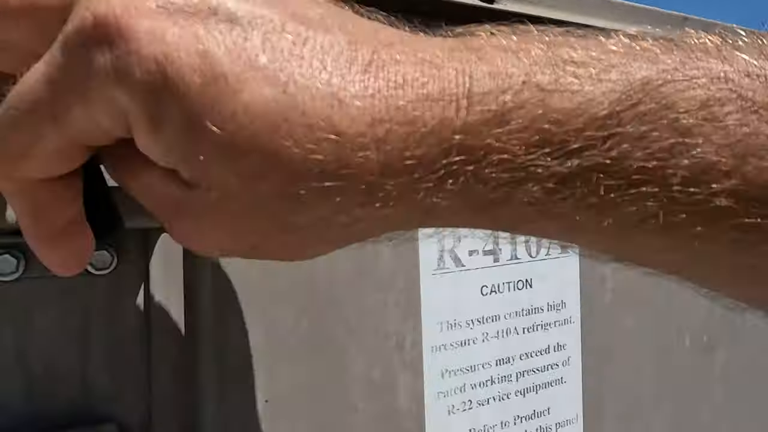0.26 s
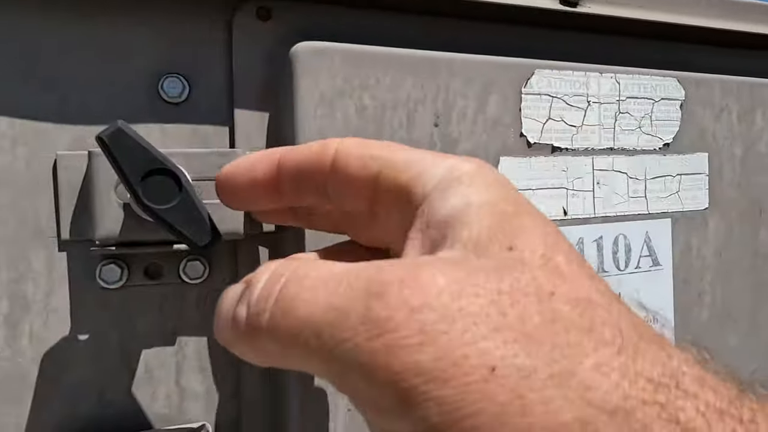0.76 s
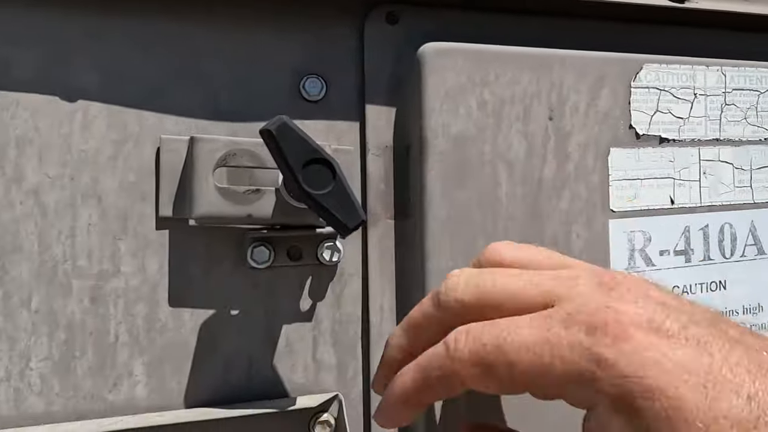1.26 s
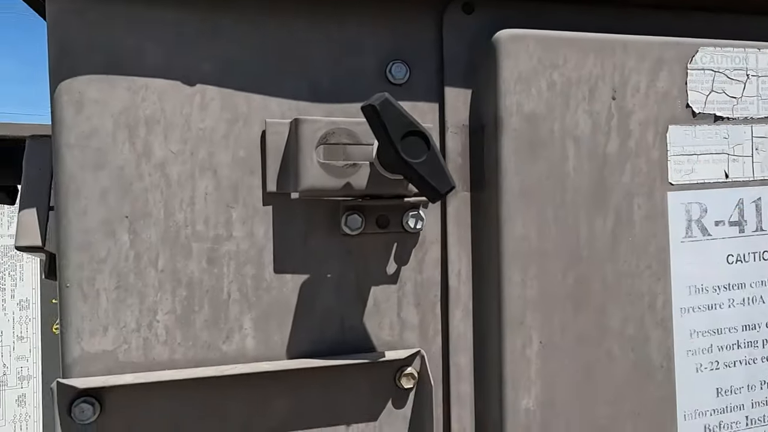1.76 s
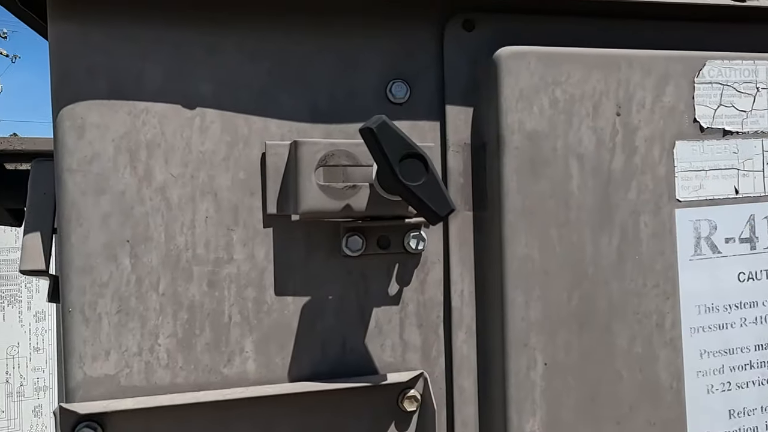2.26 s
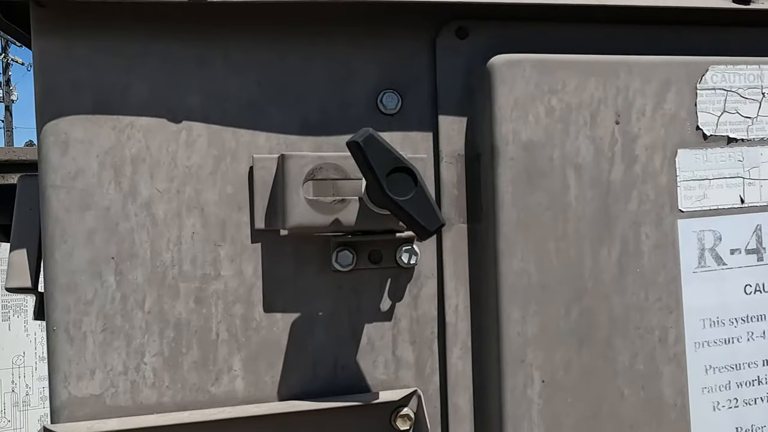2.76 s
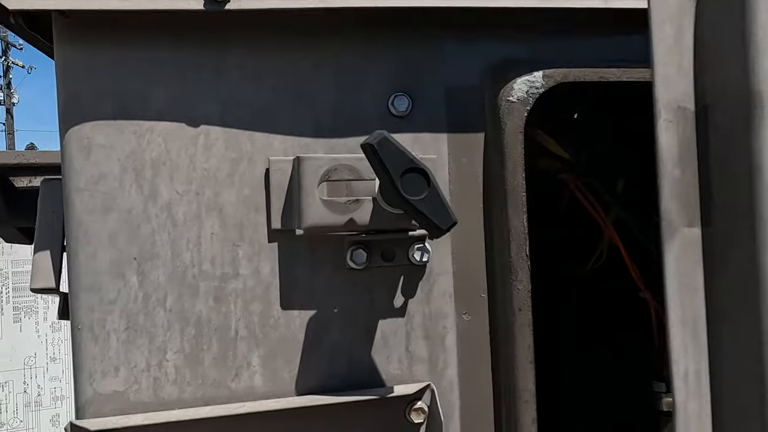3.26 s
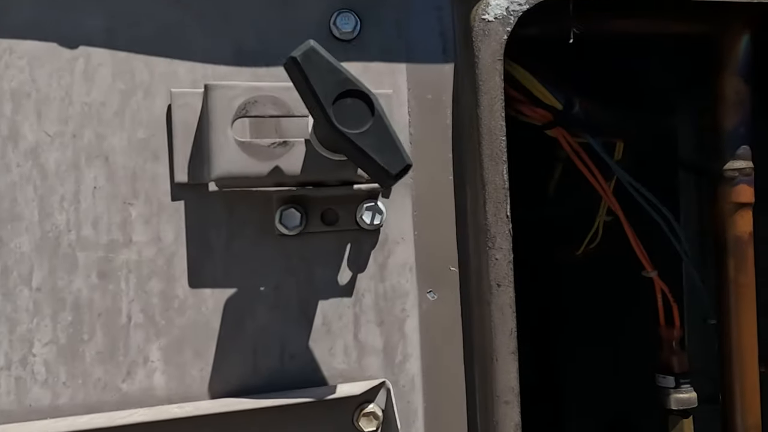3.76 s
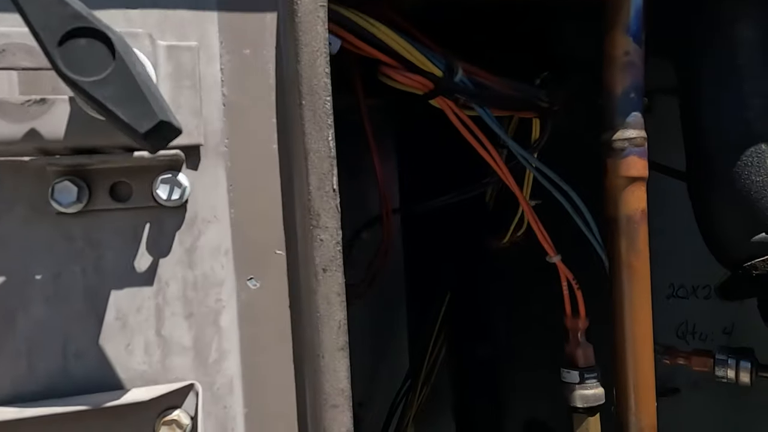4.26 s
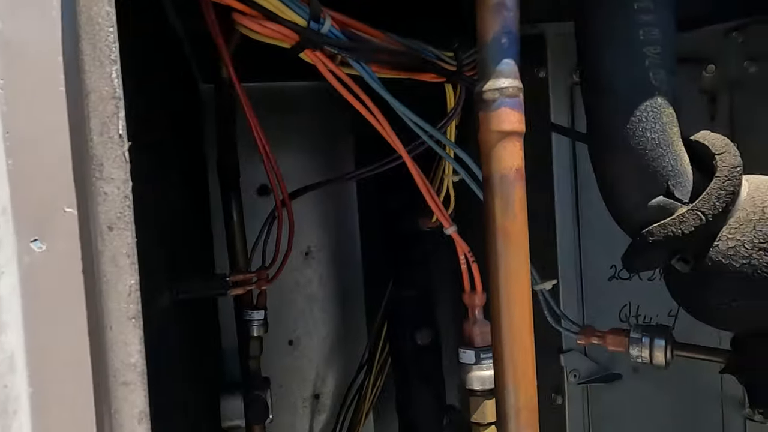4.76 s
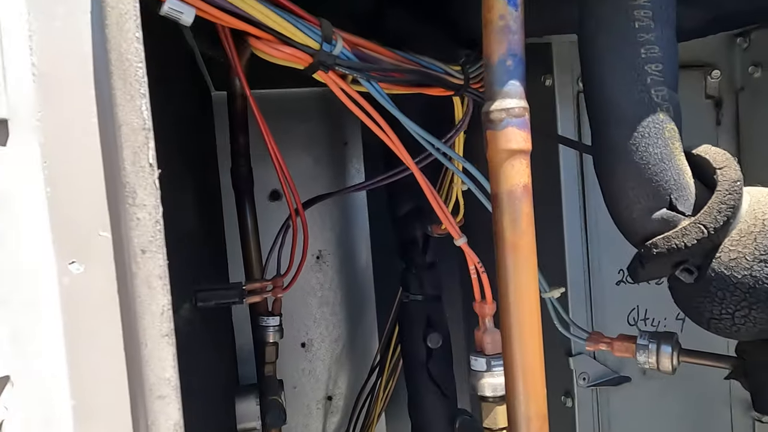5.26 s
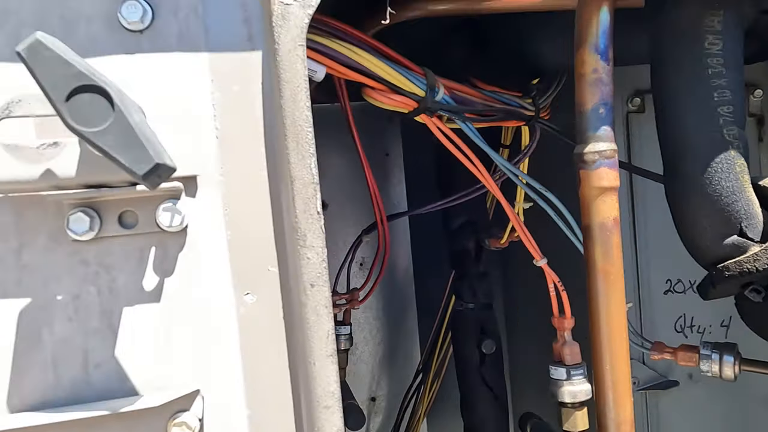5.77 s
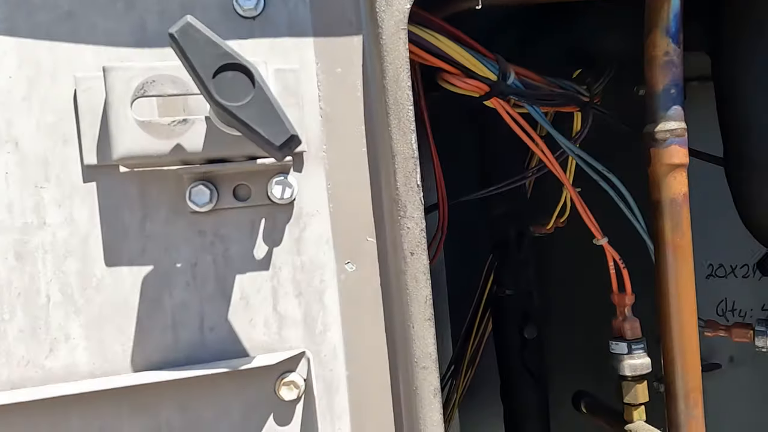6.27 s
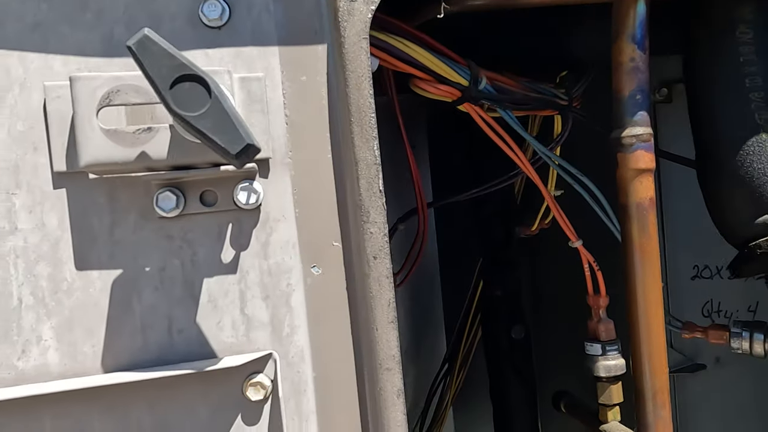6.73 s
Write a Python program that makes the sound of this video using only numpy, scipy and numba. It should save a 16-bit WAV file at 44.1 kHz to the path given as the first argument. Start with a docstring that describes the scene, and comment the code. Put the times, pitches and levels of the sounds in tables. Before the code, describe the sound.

Close to a rooftop air conditioner outdoors, a deep, hollow fan roar runs throughout with a softer rush of air. A latch knocks lightly and scrapes, then snaps with one very loud, dry metallic click. Short breathy puffs of air follow, with small ticking rubs. The service panel brushes off, and a buzzy, hissing compressor with high pipe rings emerges over the roar, strongest about a second later.

```python
"""A fan roars through the sheet-metal cabinet of a rooftop air conditioner, heard from arm's length.
A latch knocks, scrapes and snaps over with one sharp click; then the service panel rubs its way off.
The compressor's buzz, pipe rings and hiss, pulsing once a turn, come out through the opening.
Air and rubbing are filtered noise, the latch decaying modes, the compressor a clatter repeated each turn
with sine harmonics of its shaft."""
import sys
import numpy as np
from scipy import signal
from scipy.fft import rfft, irfft
from scipy.io import wavfile
from scipy.ndimage import uniform_filter1d, minimum_filter1d, map_coordinates
from numba import njit

SR = 44100
rng = np.random.default_rng(int(sys.argv[2]) if len(sys.argv) > 2 else 0)


def wav_record(signal):
    """Record a signal, one row per channel, as 16-bit PCM in the file named by sys.argv[1]."""
    frames = np.transpose(np.atleast_2d(signal))
    bounded = np.clip(frames, -1, 1)
    # unit amplitude maps onto the largest positive 16-bit level
    quanta = np.round(bounded * 32767).astype(np.int16)
    wavfile.write(sys.argv[1], SR, quanta)


N = 308700
TIME = np.arange(N) / SR  # s

# Spectra give relative levels: the noise they colour is scaled afterwards, unless noted.
# low fan roar: (frequency [Hz], density [dB per Hz])
ROAR_SPECTRUM = [(28, -66), (45, -8.5), (75, -37), (96, -1), (160, -0.5), (200, 6.5), (300, 3.5), (370, 1),
                 (480, -4.5), (700, -11), (1200, -108), (4000, -86)]
# overall level of the roar as the listener shifts about: (time [s], level [dB])
ROAR_LEVEL = [(.2, -22), (1.5, -25), (2.2, -22.5), (3.6, -23.5), (7, -24.5)]
# hollow resonances of the cabinet: (frequency [Hz], width [Hz], relative level [dB])
CABINET_MODES = [(97.1, 8.9, 2), (182.7, 9.6, -6.5), (242.7, 8.9, 5.5), (294.8, 7, 11.5)]
RING_DB, RING_OPEN_DB = -2.5, -2.5  # cabinet ring against the roar; change at full opening
# rush of fan air: (frequency [Hz], density [dB per Hz])
RUSH_SPECTRUM = [(30, -2.5), (300, 5.5), (700, 4.5), (1150, 3.5), (1500, 0.5), (2300, -3.5), (2900, -6),
                 (4200, -10), (6800, -27), (8000, -32.5), (9200, -50), (10200, -45), (12100, -39),
                 (13500, -57)]
# rush: level at opening 0, change at full opening, spread of its flutter
RUSH_DB, RUSH_OPEN_DB, RUSH_FLUTTER_DB = -31, -2, 1.34
BOOM_HZ, BOOM_WIDTH_HZ, BOOM_DB = 101.3, 55, -36  # level at full opening
# the loosened door's drone; level at its height, time of the height, 1/e half-length
DRONE_HZ, DRONE_WIDTH_HZ, DRONE_DB, DRONE_S, DRONE_LENGTH_S = 288, 35, -27.5, 2.5, 0.95

# latch blows: (time [s], gain on ring, crack and door [dB], duration of the push [s])
LATCH_BLOWS = [(.3215, -9, .0009), (.3265, -10, .0013), (.92869, 5.2, .00001), (.93027, 1.9, .00038)]
# modes of the latch: (frequency [Hz], level before blow gain and push softening [dB], t60 [s])
LATCH_MODES = [(760, -26, .02), (1860, -11, .009), (2565, -17, .021), (2940, -4, .018), (3035, -10, .0146),
               (3800, -11, .012), (4145, 5, .0039), (4600, 6, .0035), (5120, -12, .007), (5850, -17, .013),
               (7050, -18, .008), (7350, -18, .009), (9960, -15, .0045), (10330, -20, .0065),
               (11960, -24, .011)]
# modes of the door shaken by the latch: (frequency [Hz], level before blow gain [dB], t60 [s])
DOOR_MODES = [(245, -13, .07), (380, -9, .034)]
LATCH_RISE_S, DOOR_RISE_S = .00038, .004
# crack of contact: level before blow gain, decay, pitch that sets how a longer push softens it
CRACK_DB, CRACK_S, CRACK_HZ = -22, .0012, 5000
# crack of contact: (frequency [Hz], density [dB per Hz])
CRACK_SPECTRUM = [(100, -25), (1000, -3), (5000, 0), (8000, -8), (14000, -10)]

# latch and panel rubbing on sheet metal:
# (time [s], level before envelope, edge ring and dulling [dB], attack [s], length [s], centre [Hz])
SCRAPE_EVENTS = [(.25, -23, .003, .011, 2600), (.27, -28, .03, .12, 1100), (.28, -31, .005, .05, 2200),
                 (.3195, -19.5, .0005, .02, 2000), (.335, -27.5, .01, .06, 1900),
                 (.32, -23.5, .003, .04, 600), (.408, -28, .002, .012, 2000), (.766, -34, .005, .048, 2500),
                 (.828, -28, .005, .035, 2600), (.87, -31, .02, .09, 2900),
                 (.9155, -15.5, .001, .012, 1250), (.934, -28.5, .001, .02, 2400),
                 (1.0585, -20, .0003, .007, 1300), (2.725, -32.5, .015, .15, 1500),
                 (2.763, -26, .001, .008, 2800), (2.778, -28.5, .001, .007, 2900),
                 (2.797, -27.5, .001, .007, 2400), (2.821, -26, .001, .008, 2400),
                 (2.843, -29.5, .001, .007, 2600), (3.12, -28.5, .06, .22, 700),
                 (3.13, -33, .03, .16, 1900), (3.56, -27, .08, .18, 850), (3.54, -31, .08, .18, 2300),
                 (3.612, -26, .005, .026, 1400), (3.655, -28, .008, .055, 1500),
                 (3.96, -28.5, .08, .17, 1000), (3.99, -29.5, .05, .13, 2400)]
SCRAPE_GRAIN_DB, SCRAPE_GRAINS_PER_S = 2.6, 420
SCRAPE_WIDTH = .95  # bandwidth as a share of the centre frequency
# rings of the service door's rubbed edge: (frequency [Hz], width [Hz], linear gain [1])
EDGE_MODES = [(2480, 120, 0.14), (3350, 44, 0.2)]
# skin and paint dull the rubbing: (frequency [Hz], filter gain [dB])
SCRAPE_TONE = [(30, -20), (200, 0), (3000, 0), (5000, -3), (8500, -7)]

# panel: halfway time, time scale of the smooth step, compressor sound leaking past it before
PANEL_OFF_S, PANEL_PULL_S, LEAK_DB = 3.445, 0.056, -12.5
SHAFT_HZ, MAINS_HZ = 58.16, 60  # mean shaft speed; mains frequency
# listener closest to the compressor: time, 1/e half-length, gain (the buzz takes half of it)
CLOSEST_S, CLOSEST_LENGTH_S, CLOSEST_DB = 4.57, 0.58, 5
# compressor buzz: (frequency [Hz], density [dB per Hz])
BUZZ_SPECTRUM = [(30, -52), (500, -2), (1000, 7), (1250, 5), (1800, 8.5), (2300, 0.5), (2800, 5),
                 (3700, -2), (4300, -1.5), (4800, 1.5), (5500, 1.5), (5900, 3), (6900, -5.5), (7600, -7),
                 (13000, -33)]
# refrigerant hiss: (frequency [Hz], density [dB per Hz])
HISS_SPECTRUM = [(100, -60), (1500, -4), (3500, 1.5), (5200, 4.5), (5500, 0), (5780, 8), (6100, 3),
                 (6900, 4), (7600, -15.5), (9600, -14), (12100, -4), (13500, -26)]
BUZZ_DB, HISS_DB = -36.5, -40.5  # before the opening
HISS_DECAY_TURNS, HISS_STEADY = .39, .4  # decay after each gas pulse; steady part against its start of 1

# strong harmonics, each snapped to the nearest multiple of the shaft speed:
# (frequency [Hz], level before trim and sway [dB], time halfway clear [s], depth of slip beat [0-1])
SHAFT_HARMONICS = [(407, -32.3, 3.3, .18), (1163, -44.3, 4.55, .1), (1280, -47, 5.1, .1),
                   (1513, -46, 4.25, .45), (1863, -50, 4.15, .1), (1922, -48, 3.45, 0), (2676, -58, 3.6, 0),
                   (3375, -52, 4.35, .3), (3431, -52.5, 4.8, .1), (3779, -56, 3.7, .1), (4592, -57, 3.7, 0),
                   (4710, -55.5, 4.1, .1), (4770, -56, 4.1, .1), (5351, -54, 4, .2), (5873, -53.5, 5.3, .1),
                   (6455, -55.5, 4.5, .1)]
HARMONICS_TRIM_DB, CLEAR_S = -2, 0.086  # trim; time scale of coming clear
# standing waves sway the harmonics: spread, rate, and pitch from which the sway is full
STANDING_DB, STANDING_PER_S, STANDING_FULL_HZ = 1.8, 4.8, 1200
# finer waver: phase spread per Hz of pitch, level spread, rate
WAVER_RAD_PER_HZ, WAVER_DB, WAVERS_PER_S = .00017, 2.5, 14
WHINE_HZ = 4129  # snapped to the nearest shaft harmonic
# compressor whine, fading in and out as the listener moves: (time [s], level before the opening [dB])
WHINE_LEVEL = [(3.6, -62), (3.8, -41.5), (3.98, -44), (4.04, -58), (4.11, -45.5), (4.35, -46), (4.5, -53),
               (4.78, -44.5), (5.2, -57), (6.2, -50.5), (6.7, -62)]

# copper lines whose ring shifts as the listener moves:
# each (time [s], mean frequency [Hz], level before the opening [dB])
THICK_PIPE = [(3.5, 2850, -63), (4.1, 2700, -56), (4.4, 2900, -54), (4.85, 2820, -40.5), (5.2, 2900, -54),
              (5.55, 2750, -47), (6.3, 2870, -48.5), (7, 2850, -57)]
LOW_PIPE = [(3.5, 3700, -54), (3.8, 3770, -51), (4, 3700, -43), (4.2, 3660, -48), (4.52, 3650, -39),
            (4.85, 3570, -47), (5.15, 3580, -44.5), (5.6, 3570, -53), (7, 3500, -49)]
MIDDLE_PIPE = [(3.5, 4600, -60), (3.9, 4660, -46), (4.4, 4800, -62), (5.5, 4740, -71), (7, 4740, -61)]
HIGH_PIPE = [(3.5, 5900, -57), (3.8, 6050, -47), (4.1, 5820, -49), (4.45, 5800, -47), (4.6, 6020, -44),
             (4.75, 5850, -64), (5.25, 6100, -48), (5.5, 5800, -44), (6, 5770, -45), (7, 5800, -46)]
PIPE_LAG_TURNS, PIPE_LENGTH_TURNS = .3, .22  # peak after the gas pulse; 1/e half-length
# spread from turn to turn: level, pitch as a share, phase
PIPE_SCATTER_DB, PIPE_DETUNE, PIPE_SCATTER_RAD = 2, .007, 1.4

# strongest puffs of turbulent air: (time [s], level [dB])
PUFF_EVENTS = [(.65, -34), (1.17, -35.5), (1.308, -37), (1.37, -35), (1.5, -31.5), (1.699, -33),
               (1.837, -34.5), (2.1, -31), (2.232, -33), (2.427, -32), (2.625, -32), (2.828, -37),
               (3.018, -32.5), (3.146, -29), (3.28, -32), (3.445, -32.5)]
# air whistling past the door's edge: (frequency [Hz], density [dB per Hz])
PUFF_SPECTRUM = [(50, -46), (1200, 10.5), (2300, 1), (2900, 10), (3200, 3), (3550, 7.5), (4100, -1.5),
                 (6900, -5), (8500, -25), (12000, -14.5), (13500, -28)]
PUFF_S = .02 / np.sqrt(2)  # 1/e half-length
EDDY_DB, EDDY_SPREAD_DB, EDDIES_PER_S = -45, 4, 40  # level at opening 0

# side against mid, before the side's random swing: (frequency [Hz], filter gain [dB])
SIDE_TONE = [(250, -68), (1000, -48), (4000, -29), (7000, -24), (9000, -20), (10500, -13), (12000, -1)]
# microphone port: (frequency [Hz], filter gain [dB])
PORT_TONE = [(22, -40), (42, 3.5), (8700, 0), (9100, -11), (9500, 0.5)]
TOP_HZ = 13600  # treble cutoff


def fan(opening):
    """Turbulence roars, rings the cabinet and rushes; an open panel eases ring and rush and adds a boom."""
    eddies = noise()
    ring = unit(sum(undb(db) * resonate(eddies, hz, width) for hz, width, db in CABINET_MODES))
    ring = colour(ring, [(30, -38), (70, -5.5), (400, -3.0), (4000, -44)])
    # the closed box rings more than the open one
    ring = undb(RING_DB + RING_OPEN_DB * opening) * ring
    roar = unit(unit(colour(noise(), ROAR_SPECTRUM)) + ring) * level_curve(ROAR_LEVEL)

    rush_db = RUSH_DB + RUSH_OPEN_DB * opening + RUSH_FLUTTER_DB * walk(21.72)
    rush = unit(colour(noise(), RUSH_SPECTRUM)) * undb(rush_db)
    # the open compartment booms like the body of a drum
    boom = opening * undb(BOOM_DB) * narrow_noise(noise(), BOOM_HZ, BOOM_WIDTH_HZ)
    drone = undb(DRONE_DB) * narrow_noise(noise(), DRONE_HZ, DRONE_WIDTH_HZ)
    return roar + rush + boom + drone * swell(DRONE_S, DRONE_LENGTH_S)


def latch():
    """Each blow makes a noisy crack of contact and rings the modes of the latch and the door."""
    out = np.zeros(N)
    age = np.arange(SR // 4) / SR
    cracks = unit(colour(noise(), CRACK_SPECTRUM))
    door = ringing(DOOR_MODES, age, 0) * (1 - np.exp(-age / DOOR_RISE_S))
    for s, blow_db, push in LATCH_BLOWS:
        span = int(s * SR) + np.arange(len(age))
        crack = undb(CRACK_DB) * cracks[span] * np.exp(-age / CRACK_S)
        crack = crack / np.hypot(1, CRACK_HZ * push)  # a soft blow cracks less
        ring = ringing(LATCH_MODES, age, push) * (1 - np.exp(-age / LATCH_RISE_S))
        out[span] += undb(blow_db) * (ring + crack + door)
    return out


def ringing(modes, age, push):
    """Sum exponentially decaying sine modes; a longer push excites the high ones less."""
    out = 0
    for hz, db, t60 in modes:
        strength = undb(db) / np.hypot(1, hz * push)
        decay = np.exp(-np.log(1000) * age / t60)
        out = out + strength * np.sin(2 * np.pi * hz * age) * decay
    return out


def scrapes():
    """Dense stick-slip grains swell and die away, ringing the edge of the sheet metal."""
    grains = noise() * undb(SCRAPE_GRAIN_DB * walk(SCRAPE_GRAINS_PER_S))
    rubbing = 0
    for s, db, attack, length, hz in SCRAPE_EVENTS:
        age = np.maximum(TIME - s, 0)
        envelope = (1 - np.exp(-age / attack)) * np.exp(-(age / length) ** 2)
        rubbing = rubbing + undb(db) * envelope * narrow_noise(grains, hz, hz * SCRAPE_WIDTH)
    edge = sum(gain * resonate(rubbing, hz, width) for hz, width, gain in EDGE_MODES)
    return colour(rubbing + edge, SCRAPE_TONE)


def compressor():
    """One gas pulse a turn rattles round the compartment and rings the copper lines; hiss follows each."""
    turns = np.cumsum(SHAFT_HZ * (1 + 0.0002277 * walk(3))) / SR  # the speed wanders slightly
    phase = turns % 1
    near_db = CLOSEST_DB * swell(CLOSEST_S, CLOSEST_LENGTH_S)
    size = int(SR / SHAFT_HZ)
    buzz = 0
    for _ in range(5):
        # each path repeats the same clatter every turn; the mix of paths shifts as the listener moves
        clatter = rng.standard_normal(size) * np.exp(-np.arange(size) / size)
        buzz = buzz + map_coordinates(clatter, [phase * size], order=3, mode="grid-wrap") * walk(2.508)
    buzz = buzz / np.sqrt(uniform_filter1d(buzz ** 2, SR // 4))  # even out the slow level
    buzz = undb(BUZZ_DB + near_db / 2) * unit(colour(buzz, BUZZ_SPECTRUM))

    hiss_pulse = np.exp(-phase / HISS_DECAY_TURNS) + HISS_STEADY
    hiss = undb(HISS_DB) * unit(colour(noise() * hiss_pulse, HISS_SPECTRUM))
    pipes = sum(pipe_ring(turns, curve) for curve in (THICK_PIPE, LOW_PIPE, MIDDLE_PIPE, HIGH_PIPE))
    return buzz + hiss + pipes + harmonics(turns, near_db)


def harmonics(turns, near_db):
    """Shaft harmonics come clear as the listener moves in; short waves sway, some beat with motor slip."""
    out = 0
    for hz, db, clear_s, beat in SHAFT_HARMONICS:
        short = min(1, hz / STANDING_FULL_HZ) ** 2
        sway_db = STANDING_DB * walk(STANDING_PER_S) + WAVER_DB * walk(WAVERS_PER_S)
        level_db = HARMONICS_TRIM_DB + db + short * (near_db + sway_db)
        beat_cycles = 2 * (MAINS_HZ - SHAFT_HZ) * TIME + rng.random()
        throb = 1 + beat * np.sin(2 * np.pi * beat_cycles)
        out = out + undb(level_db) * rise(clear_s, CLEAR_S) * throb * partial(turns, hz)
    return out + level_curve(WHINE_LEVEL) * partial(turns, WHINE_HZ)


def partial(turns, hz):
    """The shaft harmonic nearest to hz, its phase wavering slightly; rms about 1."""
    waver = WAVER_RAD_PER_HZ * hz * walk(WAVERS_PER_S)
    cycles = round(hz / SHAFT_HZ) * turns + rng.random()
    return np.sqrt(2) * np.sin(2 * np.pi * cycles + waver)


def pipe_ring(turns, curve):
    """Each gas pulse shakes a copper line, which dies away before the next; every ring differs a little."""
    s, hz, db = np.transpose(curve)
    per_turn = rng.standard_normal((int(turns[-1]) + 1, 3))
    strength, detune, shift = per_turn[turns.astype(int)].T
    from_peak = turns % 1 - PIPE_LAG_TURNS
    pitch = np.interp(TIME, s, hz) * (1 + PIPE_DETUNE * detune)
    ring = np.sin(2 * np.pi * pitch * from_peak / SHAFT_HZ + PIPE_SCATTER_RAD * shift)
    shake = np.exp(-(from_peak / PIPE_LENGTH_TURNS) ** 2) * undb(PIPE_SCATTER_DB * strength)
    return unit(ring * shake) * undb(np.interp(TIME, s, db))


def puffs(opening):
    """Air whistles past the door's edge in short puffs, with weaker eddies that fade as it opens."""
    strong = sum(undb(db) * swell(s, PUFF_S) for s, db in PUFF_EVENTS)
    weak = undb(EDDY_DB + EDDY_SPREAD_DB * walk(EDDIES_PER_S)) * (1 - opening)
    return unit(colour(noise(), PUFF_SPECTRUM)) * np.hypot(strong, weak)


def undb(db):
    """Decibels to gain."""
    return 10 ** (np.asarray(db) / 20)


def unit(x):
    """Scale to rms 1."""
    return x / np.sqrt(np.mean(x ** 2))


def noise():
    """White noise."""
    return rng.standard_normal(N)


def colour(x, points):
    """Filter by (frequency [Hz], gain [dB]) points joined along log frequency."""
    hz, db = np.transpose(points)
    f = np.maximum(np.arange(N // 2 + 1) * SR / N, 1)
    return irfft(rfft(x) * undb(np.interp(np.log(f), np.log(hz), db)), N)


def resonate(x, hz, width):
    """One resonance, gain 1 at its centre."""
    return signal.lfilter(*signal.iirpeak(hz, hz / width, fs=SR), x)


def narrow_noise(x, hz, width):
    """Pass x through the same resonance twice and scale it to rms 1."""
    return unit(resonate(resonate(x, hz, width), hz, width))


def walk(rate):
    """Random levels held 1 / rate s and slewed twice, rms 1; they repeat after 1024 steps."""
    k = int(SR / rate)
    steps = rng.standard_normal(1024)[np.arange(N) // k % 1024]
    return unit(uniform_filter1d(uniform_filter1d(steps, k), k))


def level_curve(points):
    """Gain along a curve of (time [s], level [dB]) points."""
    return undb(np.interp(TIME, *np.transpose(points)))


def swell(s, length):
    """A bell-shaped rise and fall around time s; length is its 1/e half-length."""
    return np.exp(-((TIME - s) / length) ** 2)


def rise(s, length):
    """A smooth step from 0 to 1, halfway at time s; length is its time scale."""
    return .5 + .5 * np.tanh(.5 * (TIME - s) / length)


def scene():
    """Mix all sources straight ahead; mainly the highest air noise differs between left and right."""
    leak = undb(LEAK_DB)
    opening = leak + (1 - leak) * rise(PANEL_OFF_S, PANEL_PULL_S)
    air = fan(opening) + puffs(opening) + opening * compressor()
    # scattered off the metal, the treble swings at random between the sides
    side = colour(air, SIDE_TONE) * walk(150)
    return air + scrapes() + latch() + np.array([side, -side])


@njit
def hold(x, release):
    """Peak follower: jumps up at once and sinks slowly."""
    out, e = np.empty(len(x)), 0.
    for i in range(len(x)):
        e = max(x[i], e * (1 - release))
        out[i] = e
    return out


def record(dry):
    """The port thins deep bass and notches treble; a limiter holds the click and ducks the air after it."""
    heard = np.array([colour(channel, PORT_TONE) for channel in dry])
    peak = np.abs(heard).max(axis=0) + 1e-9
    # the slow stage eases down after a loud peak and recovers gradually
    settle = np.exp(-1 / (.028 * SR))  # 28 ms smoothing
    held = hold(np.minimum(peak, 2.1), 1 / (.16 * SR))  # 160 ms release
    reduction = 1 - np.minimum(1, .95 / held)
    gain = 1 - signal.lfilter([1 - settle], [1, -settle], reduction)
    # the fast stage looks ahead and holds peaks at about full scale
    size = SR // 2000
    needed = minimum_filter1d(np.minimum(1, 1 / (peak * gain)), size)
    ceiling = uniform_filter1d(needed, size)
    top_cut = signal.ellip(8, .2, 70, TOP_HZ, fs=SR, output="sos")
    return signal.sosfilt(top_cut, heard * gain * ceiling)


dry = scene()
out = record(dry)
wav_record(out)
```